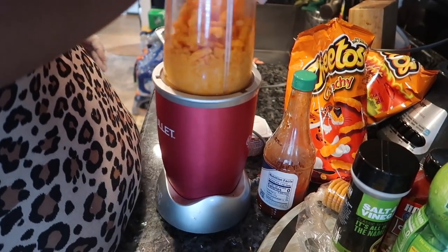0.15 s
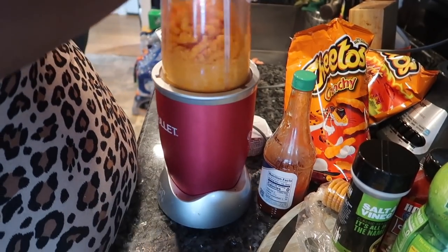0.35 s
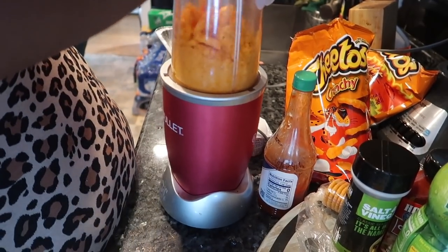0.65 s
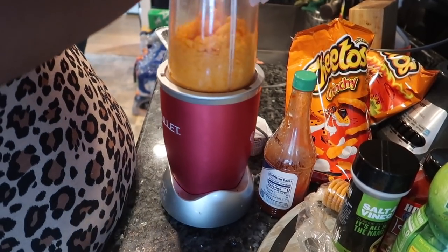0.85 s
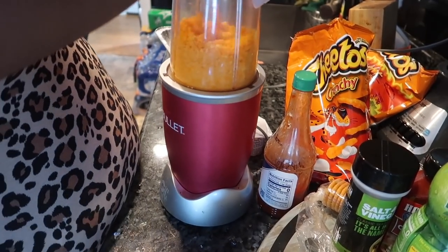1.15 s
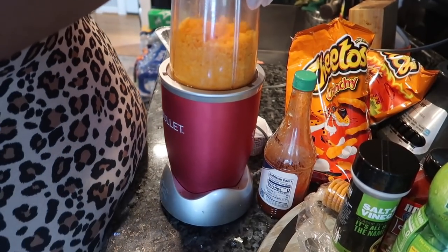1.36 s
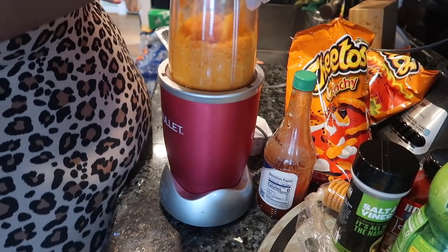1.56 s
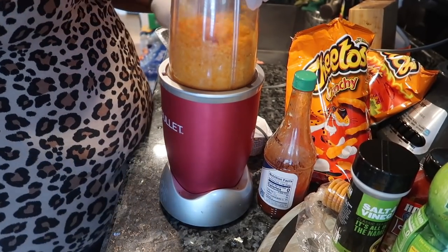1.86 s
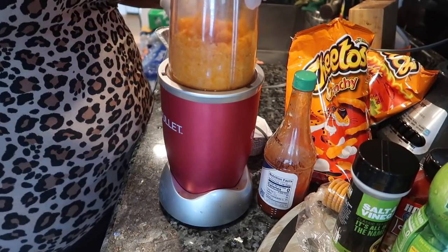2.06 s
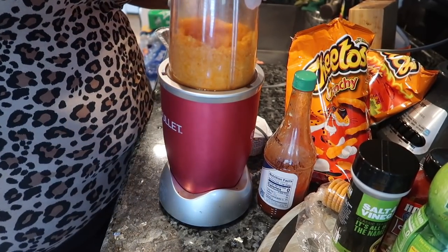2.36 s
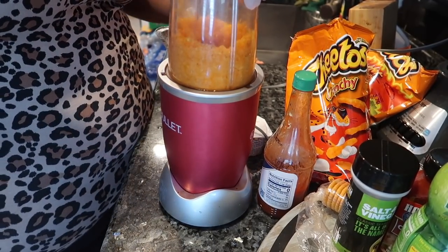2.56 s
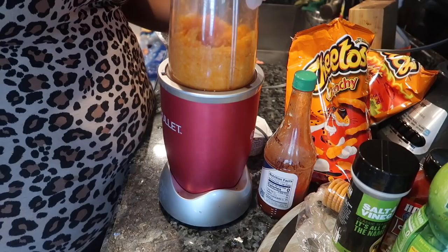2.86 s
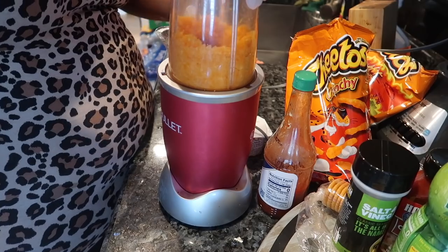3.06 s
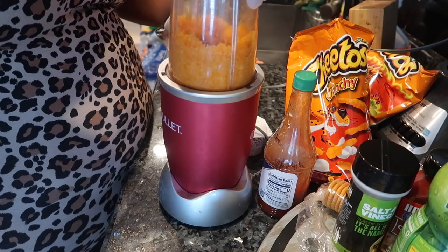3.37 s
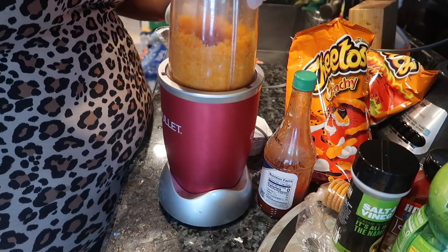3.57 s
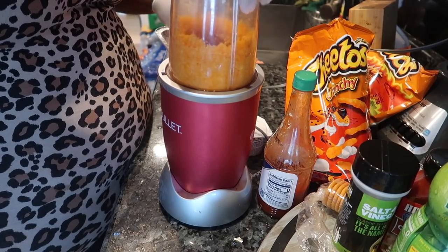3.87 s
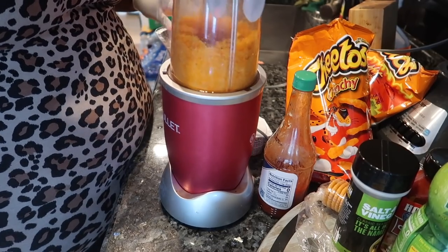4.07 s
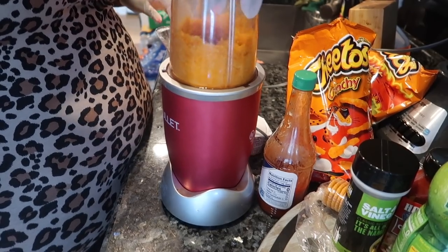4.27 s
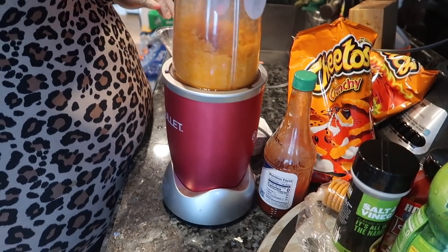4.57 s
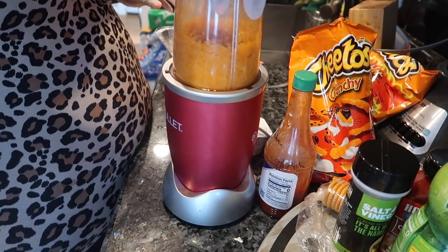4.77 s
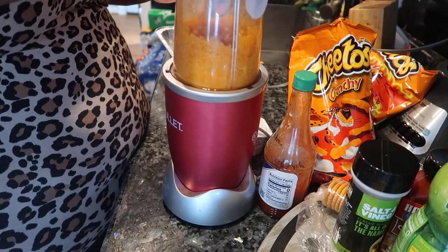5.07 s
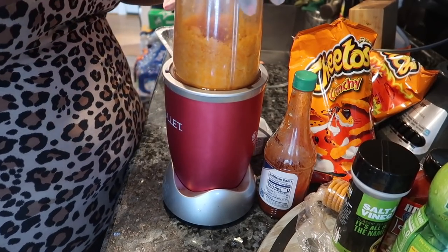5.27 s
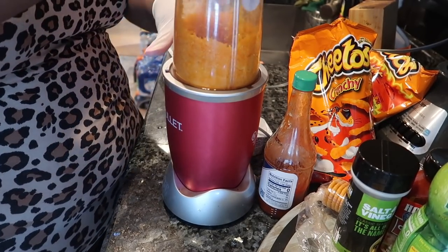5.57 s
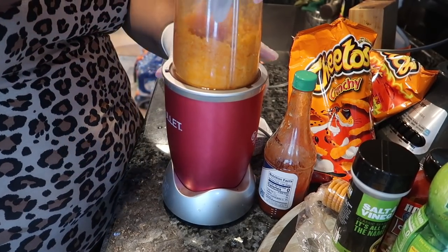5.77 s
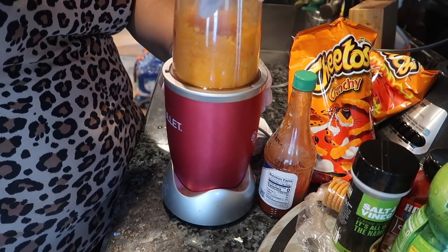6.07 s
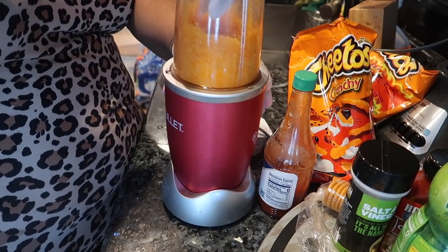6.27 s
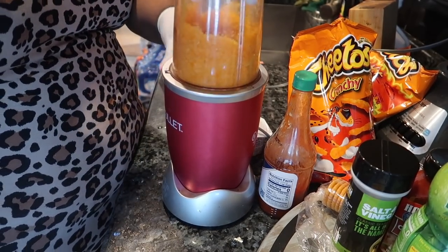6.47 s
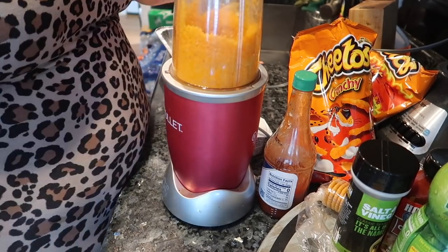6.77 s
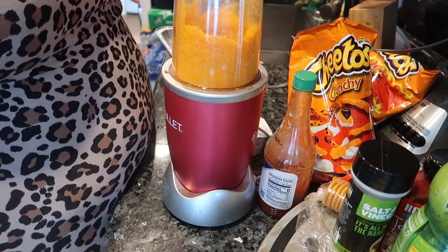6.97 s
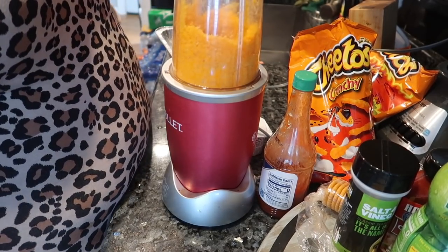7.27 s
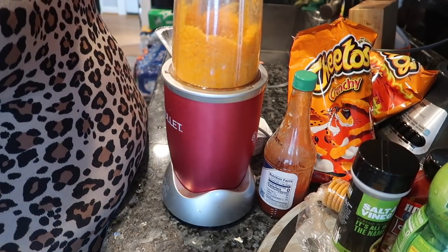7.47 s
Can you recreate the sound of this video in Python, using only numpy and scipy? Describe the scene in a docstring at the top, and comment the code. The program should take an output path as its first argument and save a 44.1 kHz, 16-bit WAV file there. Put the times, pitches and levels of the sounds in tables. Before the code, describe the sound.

A personal blender grinds dry, crunchy snacks into crumbs close by, its motor labouring then climbing to a whine before the cup clacks free and it coasts down.

```python
"""On a stone kitchen counter, a personal blender grinds dry, crunchy snacks to crumbs.
Random hits coloured by cup resonances make the crunch; filtered noise makes fan air, hiss and drone.
Tones locked to the rotor labour under load, then climb and whine as the crumbs get fine.
The cup twists free with a squeak, a clack of ringing plastic and a short buzz; the rotor coasts down."""
import sys
import numpy as np
from scipy import signal
from scipy.fft import rfft, irfft
from scipy.io import wavfile

SR = 44100
rng = np.random.default_rng(int(sys.argv[2]) if len(sys.argv) > 2 else 0)


def dump(signal):
    """Clip the signal to [-1, 1] and save it as 16-bit WAV at the path in sys.argv[1]."""
    limited = np.clip(np.atleast_2d(signal).T, -1, 1)
    pcm = np.round(limited * 32767).astype(np.int16)
    wavfile.write(sys.argv[1], SR, pcm)


N = 336384


def from_db(db):
    """Decibels to gain."""
    return 10 ** (np.asarray(db) / 20)


def rms_one(x):
    """Scale to unit power."""
    return x / np.sqrt(np.mean(x ** 2) + 1e-20)


def in_time(rows):
    """Each column of a curve, interpolated at every sample."""
    s, *columns = np.transpose(rows)
    return [np.interp(np.arange(N) / SR, s, column) for column in columns]


def drift(corner_hz):
    """Smooth random wander of spread 1: noise through two equal low-pass poles."""
    # computed at every 40th sample; the first 2000 values let the filter settle
    r = np.exp(-2 * np.pi * corner_hz * 40 / SR)
    noise = rng.standard_normal(N // 40 + 2002)
    slow = signal.lfilter([1], [1, -2 * r, r * r], noise)[2000:]
    return np.interp(np.arange(N) / 40, np.arange(len(slow)), rms_one(slow))


def swell(hz, centre_hz, width_hz, lift_db):
    """Lift in dB of something that glides through a resonance."""
    return lift_db / (1 + (2 * (hz - centre_hz) / width_hz) ** 2)


def colour(x, spectrum, modes=(), size=8192):
    """Minimum-phase filter with a broad spectrum and resonances on top of it."""
    hz = np.maximum(np.arange(size // 2 + 1) * SR / size, 1)
    knots, levels = np.transpose(spectrum)
    db = np.interp(np.log(hz), np.log(knots), levels)
    for mode in modes:
        db = db + swell(hz, *mode)
    # folding the cepstrum forward makes the filter causal
    cepstrum = irfft(np.log(from_db(db)))
    cepstrum[1:size // 2] *= 2
    cepstrum[size // 2 + 1:] = 0
    impulse = irfft(np.exp(rfft(cepstrum)))
    return signal.fftconvolve(x, impulse)[:N]


def resonate(x, hz, width_hz):
    """One resonance, gain 1 at its top."""
    r = np.exp(-np.pi * width_hz / SR)
    feedback = [1, -2 * r * np.cos(2 * np.pi * hz / SR), r * r]
    return signal.lfilter(np.array([1, 0, -1]) * (1 - r * r) / 2, feedback, x)


def shaken(hz, width_hz):
    """A resonance kept ringing by noise, filtered twice for steep skirts."""
    noise = rng.standard_normal(N)
    return rms_one(resonate(resonate(noise, hz, width_hz), hz, width_hz))


def reflections(x, t60_s, delay_s):
    """A dense train of dying echoes with unit energy."""
    t = np.arange(int(t60_s * SR)) / SR
    echoes = rng.standard_normal(len(t)) * from_db(-60 * t / t60_s) * (t > delay_s)
    return signal.fftconvolve(x, echoes / np.linalg.norm(echoes))[:N]


def tone(turns, multiple, flutter_db, wobble_rad):
    """A line locked to the rotor, unsteady in level and phase."""
    level = from_db(flutter_db * drift(7.6))
    return rms_one(level * np.sin(2 * np.pi * multiple * turns + wobble_rad * drift(26)))


def smeared(turns, multiple, corner_hz):
    """A narrow band of noise that follows a multiple of the turns."""
    phase = 2 * np.pi * multiple * turns
    return drift(corner_hz) * np.cos(phase) + drift(corner_hz) * np.sin(phase)


def spells(rows, attack_s, t60_s):
    """Gain of events that rise, hold and die away, from (start, length, level) rows."""
    t = np.arange(N) / SR
    gain = 0
    for start, length, db in rows:
        rise = np.clip((t - start) / attack_s, 0, 1)
        fall_db = 60 * np.clip((t - start - length) / t60_s, 0, 3)
        gain = gain + rise * from_db(db - fall_db)
    return gain


def bumps(rows):
    """Brief bell-shaped rises or dips, in dB."""
    t = np.arange(0, N, 40) / SR
    shape = sum(db * np.exp(-np.minimum((2 * (t - centre) / length) ** 2, 20)) for centre, length, db in rows)
    return np.interp(np.arange(N) / SR, t, shape)


def by_load(levels_db, impacts):
    """Gain between a part's levels under load and running free."""
    loaded_db, free_db = levels_db
    return from_db(free_db + (loaded_db - free_db) * impacts)


# rotor speed under power: (time [s], speed [turns/s])
SPEED = [(0, 230.5), (0.4, 225.5), (0.66, 209.5), (1.0, 191), (1.24, 201), (1.51, 194.4), (1.85, 202),
         (2.1, 193.6), (2.29, 199.3), (2.59, 193.6), (2.76, 201.5), (3.23, 212), (3.74, 240), (4.21, 276.5),
         (4.86, 280), (5.15, 292), (5.52, 298.6), (6.28, 297.4)]
# once switched off, air drag (time constant) and dry friction slow the rotor
OFF_S, DRAG_S, FRICTION_TURNS_PER_S2 = 6.275, 1.927, 58.8


def rotor_speed():
    """Turns per second: a course under power, then run down by drag and friction."""
    age = np.maximum(np.arange(N) / SR - OFF_S, 0)
    friction = FRICTION_TURNS_PER_S2 * DRAG_S
    return (in_time(SPEED)[0] + friction) * np.exp(-age / DRAG_S) - friction


def coasting():
    """0 under power, rising to 1 in 28 ms as the current goes."""
    return np.clip((np.arange(N) / SR - OFF_S) / 0.028, 0, 1)


# course of the churning in the cup: (time [s], level [dB])
CHURN = [(0, -13.5), (0.1, -17), (3.5, -17.5), (4.1, -18), (4.95, -17), (5.9, -16), (6.17, -17),
         (6.33, -22.5), (6.85, -24), (7.36, -23), (7.63, -27)]
# the blades catch a clump: (centre time [s], length [s], level change [dB])
SURGES = [(.36, 0.036, 2.5), (.578, .02, 0), (.82, 0.047, 3), (.965, 0.052, 2.5), (1.27, 0.021, 3.5),
          (1.475, 0.03, 2), (1.58, .03, 2.5), (1.67, 0.033, 1.5), (1.812, .012, 0), (1.84, .035, 1.5),
          (1.905, .04, 2.5), (2.06, 0.023, 4), (2.1, .025, 1.5), (2.143, .02, 1.5), (2.243, 0.049, 3.5),
          (2.42, .025, 1.5), (2.47, .02, 2), (2.805, 0.029, 3.5), (3.36, .035, 2.5), (3.573, 0.028, 3),
          (3.618, .035, 1.5), (3.7, .025, 2.5), (3.91, .04, 2), (4.235, 0.039, 2.5), (4.345, .04, 3),
          (4.79, 0.037, 1), (5.375, 0.037, 1), (6.5, .025, -1), (6.62, .12, 0.5), (7.385, .025, 2.5)]
# further brief swings of the churning, rises and dips alike: (centre time [s], length [s], level change [dB])
SWINGS = [(.185, .02, 1), (.235, .025, 0.5), (.61, .03, -3), (.675, .03, -0.5), (.73, 0.03, 0),
          (.885, 0.031, -3), (1.04, 0.023, -4.5), (1.18, 0.027, -3), (1.52, 0.043, -1), (1.71, 0.023, -1),
          (1.765, 0.031, -3.5), (1.797, 0.023, -6), (2.12, .015, -1), (2.212, 0.014, -4.5),
          (2.51, 0.049, -3), (3.665, .025, -3), (3.795, 0.035, -3), (4.04, 0.062, -3.5), (4.195, 0.037, -2),
          (4.385, .025, -3), (4.48, .04, -2.5), (4.96, .07, -1.5), (5.655, .04, -1.5), (6.47, .04, -3),
          (7.44, .04, -1.5)]


def churning():
    """Gain of the grinding: its slow course, clumps, further brief swings and a slight wander."""
    wander_db = 0.5 * drift(31)
    return from_db(in_time(CHURN)[0] + bumps(SURGES) + bumps(SWINGS) + wander_db)


# colour of the crunch: (frequency [Hz], relative level [dB])
CRUNCH = [(290, -47), (500, -24.5), (628, -9), (734, -11), (1020, -5.5), (1540, -1.5), (2160, -1.5),
          (2530, -1), (3990, -15), (4930, -17.5), (5940, -49), (7240, -32.5), (8710, -50.5), (9630, -88),
          (15000, -52)]
# resonances of the cup: (frequency [Hz], width [Hz], lift [dB])
CUP_MODES = [(584, 50, 0.5), (740, 53, -12), (893, 80, -0.5), (1017, 70, 3.5), (1096, 49, -1),
             (1231, 77, 4.5), (1535, 140, 4), (1753, 73, 3.5), (2186, 160, -12.5), (2480, 150, 3.5),
             (3137, 390, 5.5), (5290, 580, 4.5)]


def crunch(turns, crackle_db, hits_per_s, size_db, clump_db, sweep):
    """Pieces hit blade and cup in clumps, most often at one point of each turn."""
    chance = hits_per_s / SR * (1 + sweep * np.cos(2 * np.pi * turns))
    sizes = from_db(size_db * np.minimum(rng.exponential(1, N), 2)) * rng.choice([-1, 1], N)
    hits = (rng.random(N) < chance) * sizes * from_db(clump_db * drift(33))
    # big pieces thud and brittle ones crackle, each kind at its own moments
    big = rng.random(N) < .5
    thud = signal.sosfilt(signal.butter(2, 2400, fs=SR, output="sos"), hits * big)
    crackle = signal.sosfilt(signal.butter(2, 2400, "high", fs=SR, output="sos"), hits * ~big)
    crackle_gain = from_db(crackle_db)
    mix = (thud + crackle_gain * crackle) / np.sqrt(2 + crackle_gain ** 2)
    return rms_one(colour(mix, CRUNCH, CUP_MODES))


# colour of the fan air: (frequency [Hz], relative level [dB])
FAN = [(350, -29.5), (520, -10.5), (620, -7.5), (734, -14), (875, -10), (948, -11.5), (1400, -6),
       (1540, -5.5), (1880, 1), (2130, -2.5), (2430, -6.5), (2980, -4.5), (6950, -32), (15000, -82)]
# resonances of the motor shell: (frequency [Hz], width [Hz], lift [dB])
SHELL_MODES = [(1047, 20, 9.5), (1500, 160, -4), (1775, 41, -0.5), (1868, 120, -14.5), (2060, 110, 2.5),
               (2250, 200, 5.5), (2990, 150, -1.5)]


def fan():
    """Air rushes through the resonant motor shell: noise coloured by its modes."""
    return rms_one(colour(rng.standard_normal(N), FAN, SHELL_MODES))


# colour of the vent hiss: (frequency [Hz], relative level [dB])
HISS = [(3500, -22), (5500, -0.5), (7000, 11), (8600, -13.5), (12000, -5.5), (15000, -15)]


def roar(turns, churn, impacts, crackle_db):
    """Smashed pieces, fan air and vent hiss; air takes over as the pieces turn to crumbs."""
    # equal-power blend of pieces and air
    pieces = np.sqrt(impacts) * crunch(turns, crackle_db, hits_per_s=3400, size_db=3.0, clump_db=1.07, sweep=.5)
    air = np.sqrt(1 - impacts) * fan()
    hiss = rms_one(colour(rng.standard_normal(N), HISS))
    return churn * from_db(-1.5) * (pieces + air) + by_load((-59.5, -44.5), impacts) * hiss


# colour of the housing's drone: (frequency [Hz], relative level [dB])
DRONE = [(60, -37), (135, -6.5), (250, -7), (340, 1.5), (420, -1), (620, -3.5), (800, -6), (1300, -59)]
# resonances in the drone: (frequency [Hz], width [Hz], lift [dB])
DRONE_MODES = [(382, 89, 5.4), (466, 34, 1)]


def drone():
    """The housing drones: low coloured noise, softer without current."""
    level_db = -34 - 3.5 * coasting()
    return from_db(level_db) * rms_one(colour(rng.standard_normal(N), DRONE, DRONE_MODES))


# unbalance of the load, as hum at the reference speed before resonances: (time [s], level [dB])
UNBALANCE = [(0, -32.5), (0.35, -32.5), (0.6, -35), (1.3, -33.5), (2.1, -31.5), (2.9, -31), (3.5, -31),
             (4.45, -33.5), (5.8, -30), (6.18, -32), (6.21, -38), (6.28, -38), (6.35, -27), (6.42, -33),
             (6.65, -37.5), (7.0, -30.5), (7.1, -40), (7.27, -31), (7.36, -40)]
# resonances that the hum glides through: (frequency [Hz], width [Hz], lift [dB])
HUM_MODES = [(229.3, 14, 5), (263.4, 52, -4)]
HUM_REFERENCE_HZ, HUM_DB_PER_OCTAVE, HUM_COAST_DB = 192.6, 9, -2.5
# a slow hum radiates poorly: corner, and extra level change per octave below it
HUM_CORNER_HZ, HUM_FADE_DB_PER_OCTAVE = 156, -19


def hum(turns, speed):
    """Unbalance hums once a turn, growing with speed and gliding through resonances."""
    level_db = in_time(UNBALANCE)[0] + HUM_COAST_DB * coasting()
    level_db = level_db + HUM_DB_PER_OCTAVE * np.log2(speed / HUM_REFERENCE_HZ)
    level_db = level_db + HUM_FADE_DB_PER_OCTAVE * np.maximum(np.log2(HUM_CORNER_HZ / speed), 0)
    level_db = level_db + sum(swell(speed, *mode) for mode in HUM_MODES)
    return from_db(level_db) * tone(turns, 1, flutter_db=1.44, wobble_rad=0.041)


# overtones of the blade coupling: (multiple of the speed, relative level [dB])
COUPLING = [(3, -2.5), (4, -7), (5, 2), (6, -6), (7, -8), (10, -6.5)]


def blades_and_coupling(turns, impacts):
    """Blade tone twice a turn and coupling overtones come up as the load falls away."""
    blades = by_load((-59.5, -27), impacts) * tone(turns, 2, flutter_db=0.0, wobble_rad=0.1)
    overtones = sum(from_db(db) * tone(turns, k, flutter_db=1.0, wobble_rad=0.23) for k, db in COUPLING)
    return from_db(-1.5 * coasting()) * (blades + by_load((-55, -28), impacts) * overtones)


SLOT_COUNT = 12
WALL_HZ, WALL_WIDTH_HZ = 2512, 200


def armature_slots(turns, speed):
    """Twelve slots sing, swelling at the cup wall's resonance and fading without current."""
    lift_db = swell(SLOT_COUNT * speed, WALL_HZ, width_hz=100, lift_db=4.5)
    level_db = -39.5 + lift_db - 14 * coasting()
    return from_db(level_db) * tone(turns, SLOT_COUNT, flutter_db=0.5, wobble_rad=0.51)


# brushes on the commutator, the pitch rounded to whole multiples:
# (multiple of the speed, level under load [dB], level running free [dB], smear corner [Hz])
COMMUTATOR = [(24.6, -61.5, -58.5, 43), (36, -64.5, -63, 170), (48, -67, -71.5, 180), (60, -69, -85.5, 450)]


def brushes(turns, speed, impacts, flutter_db):
    """Thin high whistles, smeared by jolts on the shaft, swell at the brush holders' resonance."""
    out = 0
    for multiple, loaded_db, free_db, corner_hz in COMMUTATOR:
        whistle = smeared(turns, round(multiple), corner_hz)
        holder_db = swell(multiple * speed, centre_hz=5700, width_hz=3900, lift_db=5.8)
        out = out + by_load((loaded_db, free_db), impacts) * from_db(holder_db) * whistle
    return from_db(-5 * coasting() + flutter_db * drift(8.6)) * out


# resonances of the base: (frequency [Hz], width [Hz], relative level [dB])
BASE_MODES = [(522, 16, -1), (625, 65, -8), (799, 29, -7.5), (943, 77, -6.5), (1190, 130, -9),
              (1550, 250, -9.5)]


def rattle(hits_per_s, size_db):
    """Wedged lumps hammer the base unevenly; each blow sets all its resonances ringing."""
    sizes = from_db(size_db * rng.standard_normal(N)) * rng.choice([-1, 1], N)
    blows = (rng.random(N) < hits_per_s / SR) * sizes
    rings = sum(from_db(db) * rms_one(resonate(blows + 1e-18, hz, width)) for hz, width, db in BASE_MODES)
    return signal.sosfilt(signal.butter(2, [350, 2500], "band", fs=SR, output="sos"), rings)


# the cup wall rings while crumbs pack against it: (time [s], level [dB])
WALL = [(0, -58), (1.6, -36), (1.95, -24.5), (2.4, -24.5), (2.85, -28), (3.3, -28), (3.65, -26.5),
        (4.1, -40), (7.63, -47)]


def cup_wall():
    """The packed cup wall rings as a narrow band of noise."""
    return from_db(in_time(WALL)[0]) * shaken(WALL_HZ, WALL_WIDTH_HZ)


def motor_shell(speed):
    """The motor shell rings most as the rotor nears 274 turns per second."""
    level_db = -59 + swell(speed, 274, 87, lift_db=27)
    return from_db(level_db) * shaken(hz=2060, width_hz=70)


# lumps wedge and shake the machine:
# (start time [s], length [s], base gain [dB], boom of the counter [dB])
JAMS = [(1.424, 0.031, -30.5, -62), (4.13, 0.03, -26.5, -52), (4.223, 0.075, -27.5, -49),
        (4.32, 0.038, -23.5, -54), (4.368, 0.046, -31, -60), (4.423, 0.027, -32, -58),
        (4.51, .045, -29, -56), (4.556, 0.073, -40, -38), (4.63, 0.048, -29, -56),
        (4.683, 0.037, -46, -39.5), (4.73, 0.065, -29.5, -59), (4.798, 0.04, -25.5, -58)]
JAM_ATTACK_S, JAM_T60_S = 0.016, 0.098
# rumble in the rubber feet: (time [s], level [dB])
FEET = [(0, -71), (0.35, -52), (1.1, -56), (1.4, -66), (4.05, -60), (4.35, -51), (4.7, -54), (4.95, -62),
        (6.2, -59.5), (6.35, -71), (7.63, -53)]


def shudder(speed):
    """Shifting lumps and the rotor shake the base, counter and rubber feet."""
    jolts = spells([(s, length, db) for s, length, db, _ in JAMS], JAM_ATTACK_S, JAM_T60_S)
    thumps = spells([(s, length, db) for s, length, _, db in JAMS], JAM_ATTACK_S, JAM_T60_S)
    # base and counter tremble steadily beneath the jams
    base = (from_db(-44) + jolts) * rattle(hits_per_s=260, size_db=2.0)
    boom = (from_db(-67.5) + thumps) * shaken(hz=127, width_hz=23)
    # the feet rock most near 105 turns per second, and take a small share of each jam
    rocking = from_db(in_time(FEET)[0] + swell(speed, 105, 26, lift_db=13))
    feet = (rocking + from_db(-31) * jolts) * shaken(hz=60, width_hz=28)
    return base + boom + feet


# hard knocks in the cup, the one at 6.188 s sharpening the clack of the lugs snapping free: (time [s], relative
# height [dB])
KNOCKS = [(0.207, -8), (0.262, -8), (0.299, -10), (0.462, -6), (0.583, -6), (0.83, -6), (0.925, -5),
          (1.311, -6), (1.333, -7), (1.579, -6), (1.677, -7), (1.807, -9), (2.164, -13), (2.472, -4),
          (2.667, -4.5), (2.842, -5), (2.942, -7), (3.041, -15), (3.37, -7), (3.453, -6), (3.627, -7),
          (3.703, -7), (3.925, -4.5), (4.357, -6), (4.626, -8), (4.807, -8), (6.188, -6), (7.563, -12)]


def knocks():
    """Single hard blows through the cup's resonances, each with a short rattle of echoes."""
    clicks = np.zeros(N)
    for s, db in KNOCKS:
        clicks[int(s * SR)] = from_db(db)
    rattling = from_db(-2.0) * reflections(clicks, t60_s=0.036, delay_s=.0005)
    blows = colour(clicks + rattling, CRUNCH, CUP_MODES)
    # the tallest peak lands 0.5 dB above the highest table entry
    return from_db(0.5) * blows * clicks.max() / np.abs(blows).max()


# the shaft sings: (start time [s], length [s], level [dB])
SINGS = [(2.91, 0.37, -26)]
# its partials: (multiple of the speed, relative level [dB])
SING_PARTIALS = [(3, -13), (10, -7), (12, -1)]


def shaft_song(turns):
    """The shaft sings briefly on harmonics of its turning."""
    partials = sum(from_db(db) * tone(turns, k, flutter_db=0.5, wobble_rad=0.25) for k, db in SING_PARTIALS)
    return spells(SINGS, attack_s=0.039, t60_s=.15) * partials


# the bearing whines in spells:
# (start time [s], length [s], harmonic of the ball rate, sideband [whole turns], level [dB])
WHINES = [(4.2, .14, 1, 0, -31), (4.2, .14, 1, 1, -26.5), (4.54, 0.1, 1, 0, -26.5),
          (4.73, .12, 1, 0, -26.5), (4.99, 0.11, 1, 0, -22.5), (5.14, .12, 1, 0, -22.5),
          (5.3, .12, 1, 0, -22.5), (5.46, 0.13, 1, 0, -23.5), (5.66, 0.13, 1, 0, -24),
          (5.84, .11, 1, 0, -21.5), (5.99, .13, 1, 0, -21.5), (6.49, .04, 1, 0, -33),
          (6.56, 0.13, 1, 0, -30), (6.7, .07, 1, 0, -34), (6.56, .12, 2, -3, -36), (6.64, .13, 2, -1, -37)]
BEARING_ORDER = 5.355  # ball rate per turn


def bearing(turns):
    """The bearing whines between the harmonics, with a rasp around the tone once the rotor coasts."""
    rasp = from_db(-5) * coasting()
    out = 0
    for k, sideband in sorted({row[2:4] for row in WHINES}):
        multiple = k * BEARING_ORDER + sideband
        rows = [(s, length, db) for s, length, *line, db in WHINES if line == [k, sideband]]
        whine = tone(turns, multiple, flutter_db=0.5, wobble_rad=0.16)
        whine = whine + rasp * smeared(turns, multiple, corner_hz=110)
        out = out + spells(rows, attack_s=0.032, t60_s=0.22) * whine
    return out


def twist():
    """The cup squeaks upward as it is turned in its seat: a gliding narrow band of noise."""
    start_s, length_s, level_db = 6.1, .08, -25.5
    hz = np.interp(np.arange(N) / SR, [start_s, start_s + length_s], (2346.5, 2954.5))
    gain = spells([(start_s, length_s, level_db)], attack_s=.02, t60_s=.08)
    return gain * smeared(np.cumsum(hz) / SR, 1, corner_hz=43)


# the loose coupling buzzes: (start time [s], length [s], level [dB])
BUZZES = [(6.168, 0.037, -27), (6.235, 0.042, -35)]


def buzz(turns, uneven_db):
    """The loose coupling slaps the cup once a turn, unevenly hard."""
    slaps = np.diff(np.floor(turns), prepend=0) * from_db(uneven_db * rng.standard_normal(N))
    return spells(BUZZES, attack_s=0.024, t60_s=0.26) * rms_one(colour(slaps, CRUNCH, CUP_MODES))


# the locking lugs snap free: (time [s], relative level [dB])
LUGS = [(6.1806, -5), (6.1867, 4.5), (6.195, -14)]
# their ring: (frequency [Hz], T60 [s], relative level [dB])
LUG_MODES = [(1205, 0.14, -20), (1495, 0.077, -13), (1790, .03, -32), (2420, 0.042, -16), (3130, .025, -16),
             (3990, 0.024, -16), (6800, .008, -27)]


def release():
    """The lugs slip out of their slots and set the plastic ringing in dying sines."""
    out = np.zeros(N)
    for s, db in LUGS:
        age = np.arange(N - int(s * SR)) / SR
        for hz, t60_s, level_db in LUG_MODES:
            decay = from_db(db + level_db - 60 * age / t60_s)
            out[-len(age):] += decay * np.sin(2 * np.pi * hz * age)
    return signal.sosfilt(signal.butter(2, [300, 4200], "band", fs=SR, output="sos"), out)


# the freed blades ring out: (start time [s], length [s], multiple of the speed, level [dB])
BLADE_RINGS = [(6.215, .105, 2, -25), (6.32, .08, 2, -33), (6.19, .08, 3, -34), (6.2, .09, 4, -32),
               (6.235, .07, 5, -22.5), (6.32, .09, 5, -35), (6.215, .075, 6, -24), (6.3, .05, 6, -30),
               (6.2, .085, 8, -23.5), (6.22, .055, 9, -32), (6.21, .07, 10, -28), (6.37, .11, 4, -38)]


def freed_blades(turns):
    """The freed blades ring out in passing overtones of the rotor."""
    out = 0
    for s, length, k, db in BLADE_RINGS:
        gain = spells([(s, length, db)], attack_s=0.039, t60_s=0.15)
        out = out + gain * tone(turns, k, flutter_db=2.0, wobble_rad=0.16)
    return out


# housing resonances met by the low overtones: (frequency [Hz], width [Hz], lift [dB])
HOUSING_MODES = [(184, 55, 28.5), (395, 60, 24.5), (450, 30, 17)]


def rock(turns, speed):
    """The slowing rotor rocks the housing: a dull rumble, and overtones that swell at its resonances."""
    overtones = 0
    for k in (2, 3, 4):
        lift_db = sum(swell(k * speed, *mode) for mode in HOUSING_MODES)
        overtones = overtones + from_db(lift_db) * tone(turns, k, flutter_db=1.5, wobble_rad=0.23)
    rumble = from_db(17) * shaken(hz=388, width_hz=220)
    # the rocking is strongest near 117 turns per second
    rocking_db = -69.5 + swell(speed, 117, 86, lift_db=20.7)
    return from_db(rocking_db) * (from_db(-8.5) * overtones + rumble)


# grinding load: (time [s], share of blade impacts [0-1], crackle against thud [dB])
LOAD = [(0, 0.68, 3.5), (1.0, 0.9, 3.5), (1.9, 0.87, -0.5), (3.4, 0.86, -4), (4.2, 0.47, -1.5),
        (4.9, 0.36, 3), (5.2, 0.13, -1.5), (6.17, 0.04, 11.5), (6.3, 0.56, 1), (7.63, 0.9, -4.5)]
# side gain of the second layer of roar and brushes: (frequency [Hz], gain [dB])
WIDTH = [(30, -64), (250, -22), (450, -12), (1100, -48.5), (1550, -19), (2400, -37.5), (3200, -27.5),
         (3900, -13), (4700, -4.5), (6000, -3), (7500, 0.5), (8800, 13), (11500, 10), (14000, 2)]
# the right side hears the midrange a touch louder: (frequency [Hz], share of the mid [dB])
LEAN = [(30, -55), (125, -73), (300, -31.5), (1000, -45.5), (2500, -37)]


def scene():
    """The blender close by in a small kitchen; mainly the treble differs between left and right."""
    speed, churn = rotor_speed(), churning()
    turns = np.cumsum(speed) / SR
    impacts, crackle_db = in_time(LOAD)
    clatter = roar(turns, churn, impacts, crackle_db) + drone() + knocks()
    clatter = clatter + twist() + buzz(turns, uneven_db=2.0) + release()
    room = from_db(-9) * reflections(clatter, t60_s=0.19, delay_s=0.0026)
    motor = hum(turns, speed) + blades_and_coupling(turns, impacts) + armature_slots(turns, speed)
    motor = motor + brushes(turns, speed, impacts, flutter_db=5.5) + bearing(turns)
    shaking = cup_wall() + motor_shell(speed) + shudder(speed) + rock(turns, speed)
    mid = clatter + room + motor + shaking + shaft_song(turns) + freed_blades(turns)
    # roar and brushes are drawn afresh for the side, so the treble sounds wide and diffuse
    second_layer = roar(turns, churn, impacts, crackle_db) + brushes(turns, speed, impacts, flutter_db=0.5)
    side = colour(second_layer, WIDTH) - colour(mid, LEAN)
    return np.array([mid + side, mid - side])


def record(dry):
    """The tallest peaks are rounded towards 0.95 and the top is cut above 15 kHz."""
    rounded = dry / (1 + (dry / .95) ** 8) ** (1 / 8)
    return signal.sosfilt(signal.ellip(12, .1, 90, 15000, fs=SR, output="sos"), rounded)


dry = scene()
out = record(dry)
dump(out)
```